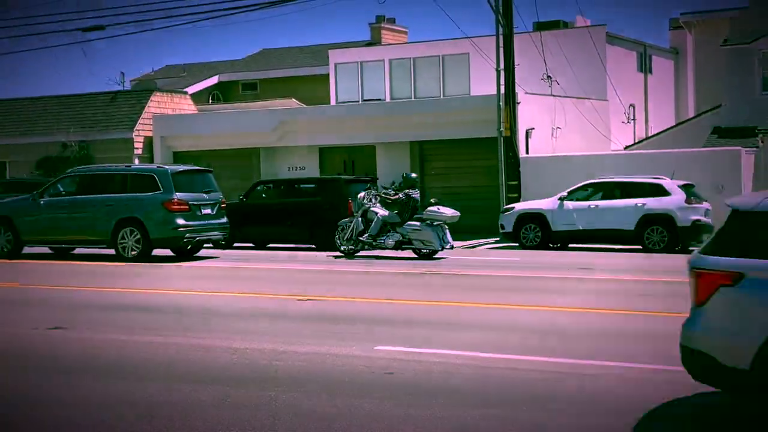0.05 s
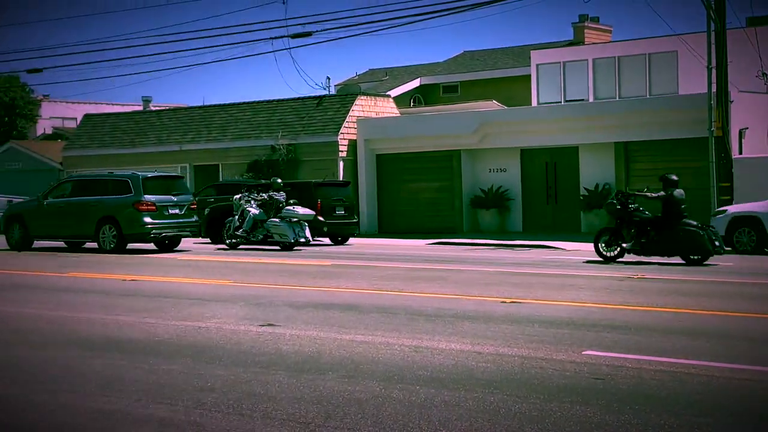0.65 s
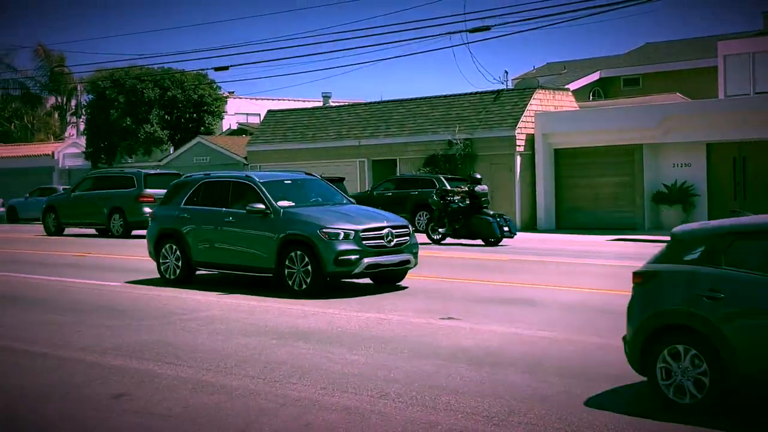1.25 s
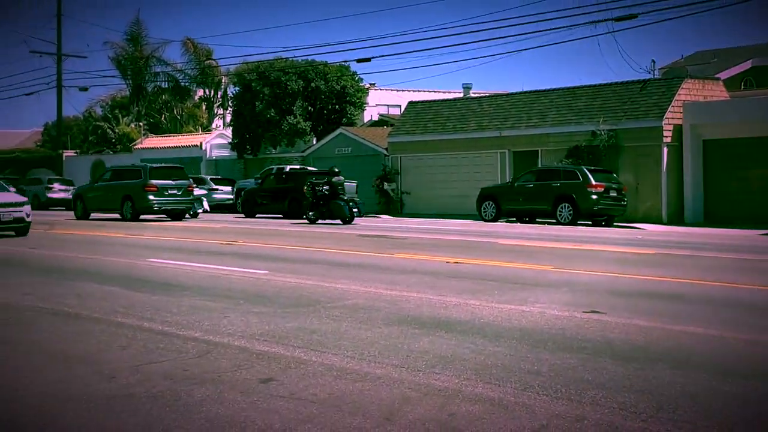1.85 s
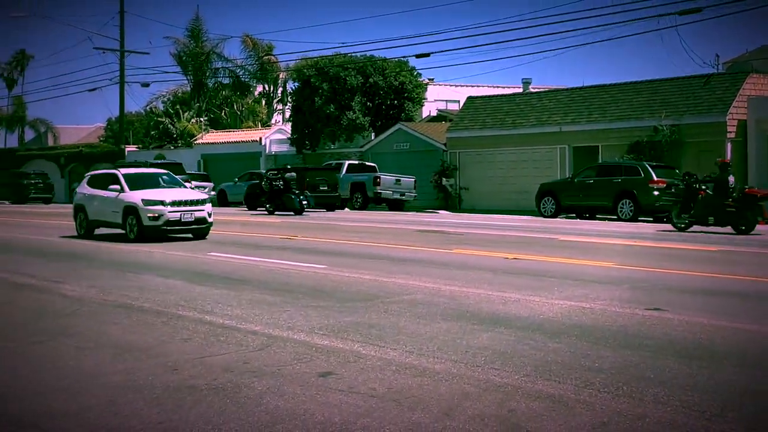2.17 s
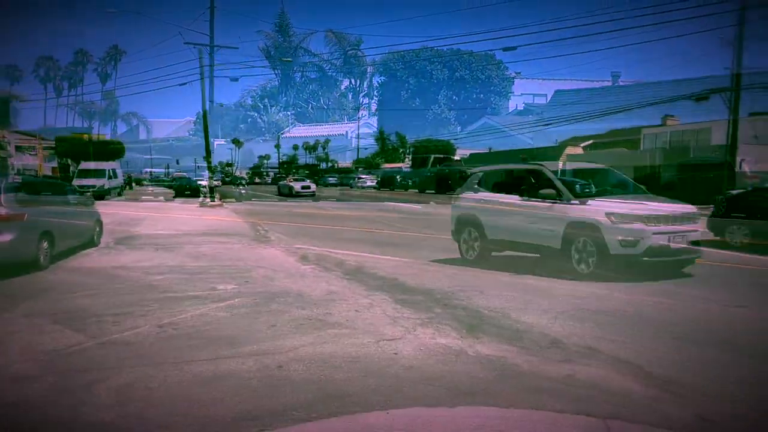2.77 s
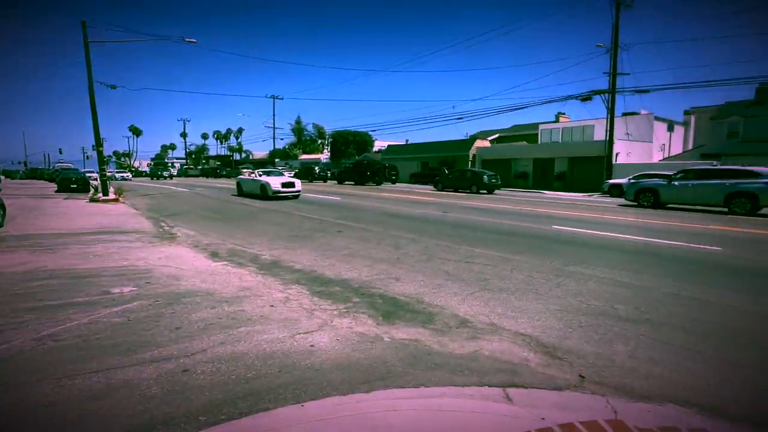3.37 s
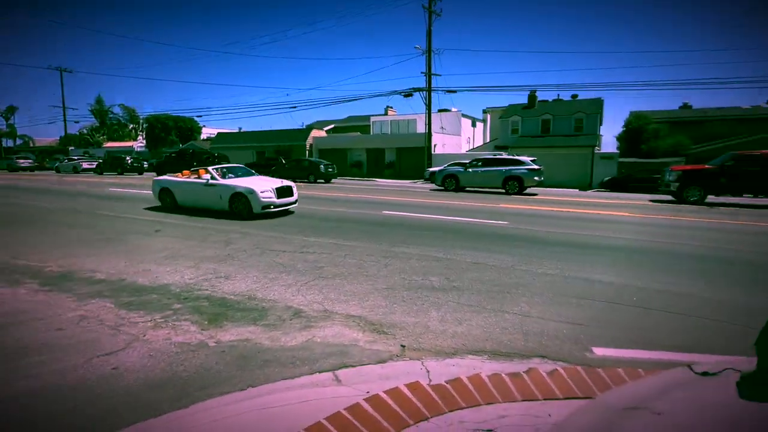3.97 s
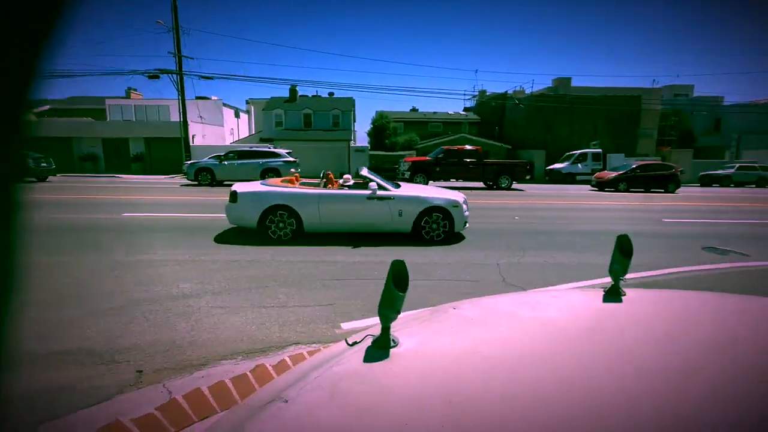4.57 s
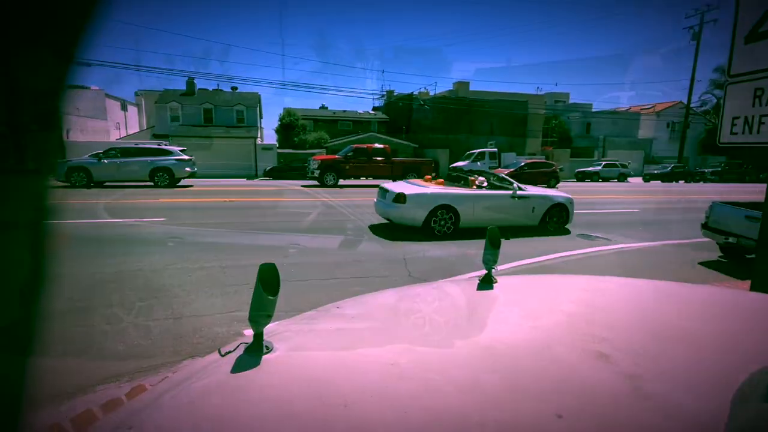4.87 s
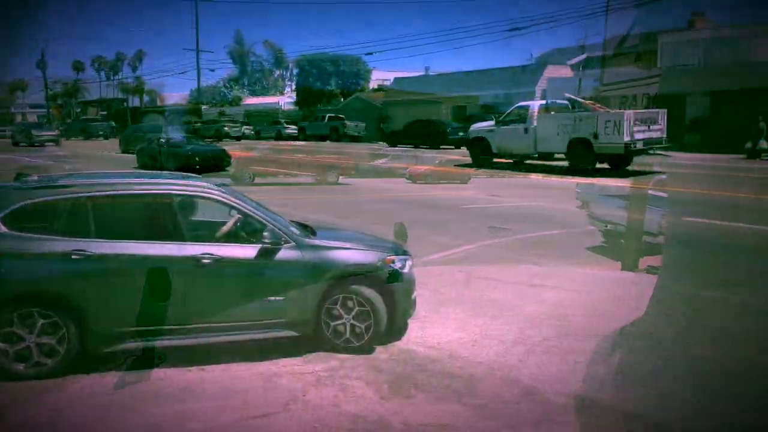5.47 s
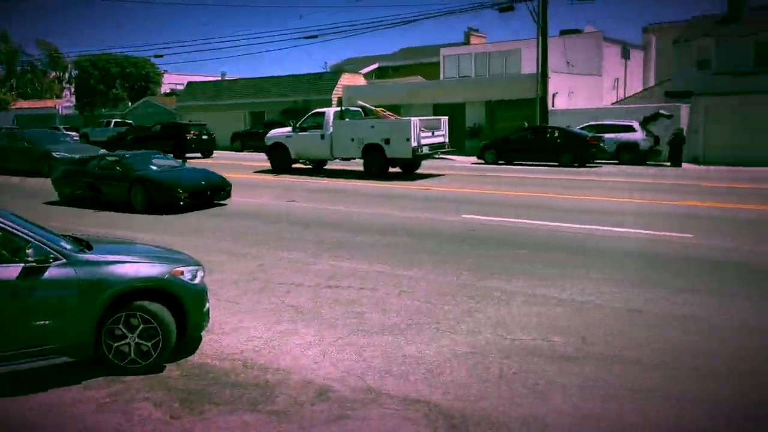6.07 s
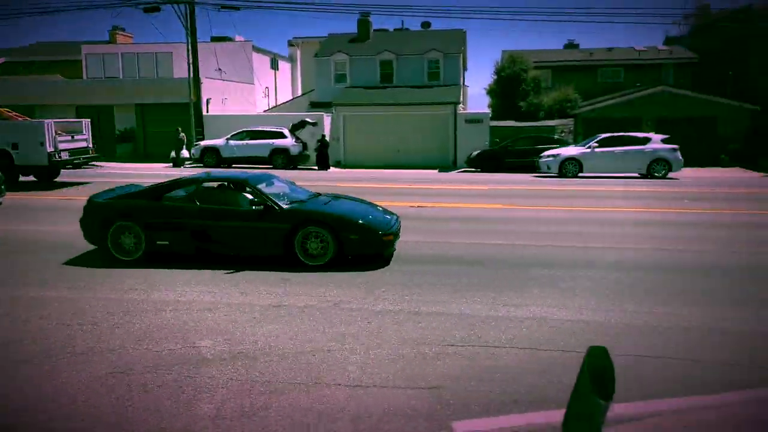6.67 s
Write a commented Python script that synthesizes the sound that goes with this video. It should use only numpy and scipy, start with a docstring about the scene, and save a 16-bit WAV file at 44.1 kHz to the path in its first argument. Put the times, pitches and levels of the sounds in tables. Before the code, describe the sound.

Two large motorcycles accelerate past at once, their exhausts booming and rasping with an uneven throb as each changes up a gear. As they fade, a quieter car drones by on roaring tyres. A pickup hums faintly, then a sports car approaches with a swelling growl. It is heard in stereo from the kerb of a road between houses, with a faint breeze.

```python
"""Coastal road between houses. Two V-twin motorcycles accelerate past, each changing up a gear:
uneven firings boom in the pipes, bark and rasp at the mouths and blow out gas; valves tick.
A car drones by on roaring tyres, a pickup hums, and a sports car draws near, its engine orders
growling and its intake rasping. Two small kerbside microphones in a light breeze hear it all;
the loudest peaks are rounded off."""
import sys
import numpy as np
from scipy import signal
from scipy.fft import rfft, irfft, next_fast_len
from scipy.io import wavfile
from scipy.ndimage import uniform_filter1d

SR = 44100
rng = np.random.default_rng(int(sys.argv[2]) if len(sys.argv) > 2 else 0)


def wrap_up_sound(samples):
    """Save the sound to the file named by the first command line argument, as 16-bit audio."""
    columns = np.atleast_2d(samples).T
    # keep every value between -1 and 1, then stretch to whole-number steps
    tamed = np.clip(columns, -1, 1)
    steps = np.round(tamed * 32767).astype(np.int16)
    wavfile.write(sys.argv[1], SR, steps)


N = 296660
TIME = np.arange(N) / SR

# Following motorcycle's engine speed. Each row: time in seconds, four-stroke cycles per second.
CHASE_SPEED = [(0, 17.3), (.3, 19.4), (.49, 20.7), (.6, 21.6), (.85, 23.3), (1.0, 24.3), (1.26, 25.3),
               (1.36, 21.3), (1.7, 22.4), (2.0, 23.4), (2.3, 24.3), (2.9, 26.1)]
# Tyre spectra. Each row: frequency in Hz, gain in dB.
TYRE_RUMBLE = [(20, -20.5), (35, -20), (52, 2), (80, 6.5), (130, 0.5), (200, 0.5), (280, -5.5), (400, -26),
               (800, -62.5)]
TYRE_HISS = [(1500, -18), (2500, 2), (3100, 2), (4500, -3.5), (6000, -8.5), (8500, -20), (10500, -15.5),
             (12500, -28), (14000, -51.5)]
# Stereo width, open road and between houses. Each row: frequency in Hz, side gain in dB.
ROAD_WIDTH = [(60, -14.5), (200, -5.5), (400, -2), (620, -4.5), (800, 4.5), (980, 1.5), (1230, 7.5),
              (1420, 5.5), (1620, 9), (1900, -1), (4000, -1), (13000, 3)]
STREET_WIDTH = [(60, -28.5), (120, -19.5), (200, -16), (360, -8), (660, -11), (1200, -4), (2200, -7.5),
                (4000, -109), (7000, 2.5), (13000, -4)]

STREET_T60_S, CHASE_START_TURNS = 0.888, 0.143
SPORTS_PASS_S = (6.898, 0.629)  # path for passing()
LATER_SPAN_S, CLOSE_SPAN_S = (4.57, 5.354, 7, 7.5), (5.843, 6.286, 7, 7.5)  # spans for envelope()


def motorcycles():
    """Two V-twins, one leading and one following, fire into their pipes; house fronts answer."""
    # Leader's engine speed. Each row: time in seconds, four-stroke cycles per second.
    lead_speed = [(0, 30.1), (.33, 32.1), (.55, 33), (.8, 34.1), (.97, 34.5), (1.1, 33.2), (1.22, 30),
                  (1.32, 26.5), (1.45, 26.8), (2.0, 27.5), (2.4, 28.7), (2.9, 32)]
    # Each row: time in seconds, leader minus follower in dB.
    balance = [(0, 11), (.6, -4), (1.3, -3.5), (2.25, -5), (2.9, 1)]
    lean = undb(curves(balance)[0] / 2)
    lead = v_twin(lead_speed, spread_db=2, jitter_s=0.00005, start_turns=0.15)
    chase = v_twin(CHASE_SPEED, spread_db=3, jitter_s=0.0001, start_turns=CHASE_START_TURNS)
    firings = undb(2) * lean * lead + chase / lean  # the leader has the more open pipes
    mid = pipe_boom(lead, chase, lean) + pipe_mouths(firings) + gas_hiss(firings) + valves() + clatters()
    walls = scatter(colour(mid, [(100, -8), (250, 2), (500, 0), (14000, 0)]), t60_s=0.3)
    side = np.sqrt(2 / 3) * quadrature(mid) + np.sqrt(1 / 3) * walls
    return stereo(mid, side, STREET_WIDTH)


def v_twin(speed, spread_db, jitter_s, start_turns):
    """Two uneven firings a cycle: the rear cylinder follows the front by 315 of 720 degrees."""
    turns = start_turns + np.cumsum(curves(speed)[0]) / SR
    due_turns = (np.arange(int(turns[-1]))[:, None] + [0, 315 / 720]).ravel()[1:]
    chance = rng.standard_normal((len(due_turns), 2))
    fire_s = np.interp(due_turns, turns, TIME) + jitter_s * chance[:, 0]
    pulses = np.zeros(N)
    pulses[np.clip(fire_s * SR, 0, N - 1).astype(int)] = undb(spread_db * chance[:, 1])
    return pulses


def pipe_boom(lead, chase, lean):
    """Firings ring the low modes of both exhausts; the deepest notes die away first."""
    # Exhaust modes. Each row: centre in Hz, width in Hz, gain in dB.
    lead_pipe = [(60.8, 30, -2), (102.6, 40.7, -0.5), (148, 40.1, -1), (195.8, 41.6, -8.5),
                 (240, 43.8, -8.5), (287.8, 35.6, -5)]
    chase_pipe = [(59.26, 16, 0.5), (147.6, 27.8, -5), (186.86, 44.8, -7), (243.8, 52, -6.5)]
    # Follower's strongest mode booms and ebbs. Each row: time in seconds, gain in dB.
    note_level = [(0, -3), (.6, -1.5), (.9, 1), (1.05, -0.5), (1.2, 3.5), (1.3, -3), (1.45, 3), (1.6, -2),
                  (1.72, 5), (1.85, 1.5), (2.0, 4), (2.3, 2.5), (2.42, -8.5), (2.9, -7)]
    note = undb(curves(note_level)[0]) * ring(chase, [(117.66, 20.34, 0)])
    boom = lean * steady(ring(lead, lead_pipe)) + steady(ring(chase, chase_pipe) + note) / lean
    boom = colour(boom, [(20, -3.5), (42, -16.5), (58, -0.5), (120, 1),
                         (200, 0.5), (400, -16.5), (1000, -45)])
    boom = steady(boom + undb(0.5) * scatter(boom, STREET_T60_S))
    boom *= undb(glide(-5.5, -9.5, middle_s=-1, scale_s=4.5))
    deep = filtered(boom, lambda hz: 1 / (1 + (hz / 80) ** 8))
    return (boom - deep * (1 - fade(1.9, 2.75))) * fade(2.42, 2.936)


def pipe_mouths(firings):
    """Blasts bark and rasp at the pipe mouths, changing voice as these turn towards the kerb."""
    # Spectra. Each row: frequency in Hz, gain in dB.
    bark_spectrum = [(150, -23.5), (225, 1), (280, 3), (350, 2), (420, -1), (490, -13), (620, -24.5),
                     (1200, -51)]
    rasp_spectrum = [(300, -31), (490, 13), (620, 7.5), (800, 0.5), (1000, 1), (1300, -15.5), (1700, -29.5),
                     (2300, -22), (4000, -48)]
    blast = steady(firings) + undb(-16) * steady(puffs(firings, decay_s=0.006))
    walls_db = -12 + 13 * np.clip(TIME / 1.4, 0, 1)  # more reflected sound with distance
    blast = mirrored(blast + undb(walls_db) * scatter(blast, STREET_T60_S))
    rasp_db = glide(-18.5, -31.5, middle_s=0.5341, scale_s=0.0044)
    rasp_db += 7.6 * bell(0.793, half_s=0.19)  # follower comes abreast
    bark_db = glide(-18.5, -17.5, middle_s=1.68, scale_s=1.22) + 1.1 * walk(16)
    bark_db += 2.4 * bell(2.41, half_s=0.057)  # follower pulls
    rasp = undb(rasp_db) * steady(colour(blast, rasp_spectrum))
    bark = undb(bark_db) * steady(colour(blast, bark_spectrum))
    return (bark + rasp + mouth_ring(blast)) * fade(2.5, 3.01)


def mirrored(x, echo_db=-8):
    """Reflection off parked cars; the changing detour sweeps a comb through the sound."""
    # Each row: time in seconds, delay in ms.
    detour = [(0, 4.02), (.5, 3.506), (.8, 3.75), (1.0, 3.76), (1.25, 3.18), (1.5, 3.06), (2.0, 2.893),
              (2.45, 2.79), (2.9, 3.03)]
    return x + undb(echo_db) * np.interp(TIME - curves(detour)[0] / 1000, TIME, x)


def mouth_ring(blast):
    """Throaty resonances of the pipe mouths sink in pitch as the riders pass."""
    # Each row: approaching centre in Hz, leaving centre in Hz, width in Hz, gain in dB.
    modes = [(213.3, 180.6, 54, 3), (455.2, 412.3, 63.3, 5.5), (646, 605, 93.3, -5)]
    # Each row: time in seconds, level in dB.
    level = [(0, -21.5), (.3, -19), (.52, -24.5), (.65, -16), (.85, -20.5), (1.15, -26.5), (1.4, -33),
             (1.7, -46), (2.2, -70)]
    voice = sum(undb(db) * sweep(blast, glide(high_hz, low_hz, middle_s=0.645, scale_s=0.664), width_hz)
                for high_hz, low_hz, width_hz, db in modes)
    return undb(curves(level)[0]) * steady(voice)


def gas_hiss(firings):
    """Exhaust gas hisses in puffs over an even flow and fades; swells of traffic hiss rise over it."""
    # Each row: frequency in Hz, gain in dB.
    spectrum = [(700, 9), (1400, 7.5), (2100, 6), (2700, 4.5), (4000, 1.5), (5500, -0.5), (6800, -5),
                (8200, -26), (10000, -13), (12000, -21), (14000, -27.5)]
    # Each row: centre in seconds, level in dB, half length in seconds.
    traffic_swells = [(1.52, -43, 0.16), (2.04, -43, 0.095), (2.33, -37.5, 0.126)]
    gas = steady(puffs(firings, decay_s=0.015)) * undb(1.8 * walk(40)) + undb(3) * noise()
    gain = undb(glide(-26.5, -34, middle_s=1.2449, scale_s=0.96)) + swells(traffic_swells)
    return gain * undb(0.7 * walk(18)) * steady(colour(gas, spectrum)) * fade(2.58, 2.92)


def valves(ring_hz=5400, ring_s=0.003):
    """The follower's valves tap; each tap rings the cylinder head at its own pitch."""
    # Each row: frequency in Hz, gain in dB.
    tap_spectrum = [(1500, -11.5), (3000, 4), (4500, 2), (5800, -2.5), (7000, -8), (8500, -33.5),
                    (13000, -23)]
    # Audible spells. Each row: centre in seconds, level in dB, half length in seconds.
    spells = [(.335, -38.5, 0.035), (.49, -37, 0.066), (0.575, -35.5, 0.035), (0.68, -35.5, 0.143),
              (.92, -34, 0.127), (1.255, -34, 0.0325), (1.318, -36, 0.0144)]
    taps = v_twin(CHASE_SPEED, spread_db=1, jitter_s=0.0003, start_turns=CHASE_START_TURNS)
    hz = ring_hz * (1 + 0.092 * rng.standard_normal(512))[np.cumsum(taps > 0)]
    clink = decays(taps, ring_s) * np.sin(2 * np.pi * np.cumsum(hz) / SR)
    tap = steady(colour(puffs(taps, decay_s=0.002), tap_spectrum))
    return swells(spells) * (tap + undb(-4) * steady(clink))


def clatters():
    """Motorcycle clatters and clinks: short swells of noise, each in one resonance."""
    # Each row: centre in seconds, level in dB, centre in Hz, width in Hz, half length in seconds.
    events = [(0.414, -22, 928, 420, .05), (0.426, -41.5, 10370, 3000, 0.044),
              (0.586, -19.5, 5800, 900, 0.004), (2.165, -25, 1500, 350, 0.0087),
              (2.658, -41, 5470, 1499, 0.098)]
    out = np.zeros(N)
    for s, db, hz, width_hz, half_s in events:
        start, count = int((s - half_s) * SR), int(2 * half_s * SR)
        mode = [(hz, width_hz, 0)]
        burst = ring(ring(rng.standard_normal(SR // 2), mode), mode)[-count:]
        out[start:start + count] += undb(db) * burst / burst.std() * np.hanning(count)
    return out


def exhaust_cracks(decay_s=0.00237):
    """A hard firing kicks a pipe, which rings for a cycle or two."""
    # Each row: start in seconds, gain in dB, ring in Hz.
    hard_firings = [(.042, -1.5, 600), (.075, -7.5, 620), (.316, -6, 640), (.562, -17.5, 620),
                    (2.509, -13, 600), (6.17, -12, 730), (6.538, -11.5, 790)]
    out = np.zeros(N)
    age_s = TIME[:2048]
    for s, db, hz in hard_firings:
        start = int(s * SR)
        crack = np.sin(2 * np.pi * hz * age_s) * np.exp(-age_s / decay_s)
        out[start:start + len(age_s)] += undb(db) * crack
    return direct(out, STREET_WIDTH)


def car_engines():
    """The first car's drone, a deeper engine beyond it and the pickup's falling hum."""
    # First car's engine speed. Each row: time in seconds, firing rate in Hz.
    drone_speed = [(2.85, 176.8), (3.5, 183.9), (4, 186.9), (4.6, 188.9), (5.2, 194.1)]
    # Each row: multiple of the firing rate, gain in dB.
    drone_orders = [(.5, -20), (.75, -12.5), (1, -1), (1.25, -32.5), (2, -27.5)]
    # One swell, then brief dips. Each row: centre in seconds, change in dB, half length in seconds.
    drone_changes = [(3.3, 1.5, 0.257), (3.711, -4.5, 0.176), (4.138, -10.5, 0.087), (4.443, -5, 0.055)]
    # Each row: time in seconds, pitch in Hz, level in dB.
    far_track = [(2.95, 73.43, -27.5), (3.2, 76.66, -30.5), (3.35, 85.66, -22), (3.55, 86.02, -29.5),
                 (3.85, 85.62, -24), (3.97, 83.23, -28)]
    pickup_track = [(5.2, 333.1, -31.5), (5.4, 329.5, -30.5), (5.8, 324.9, -37.5), (5.95, 325.2, -42.5)]
    drone = engine(curves(drone_speed)[0], drone_orders, waver=0.00724, flutter_db=0.11)
    changes_db = sum(db * bell(s, half_s) for s, db, half_s in drone_changes)
    drone *= undb(-17.5 - 2.5 * (TIME - 3.08) + changes_db) * envelope((2.9, 3.08, 4.7, 5.25))
    hz, db = curves(far_track)
    far = undb(db) * engine(hz, [(1, 0), (3, -10.5)], waver=0.015, flutter_db=1.2)
    hz, db = curves(pickup_track)
    pickup = undb(db) * engine(hz, [(1 / 3, -3), (1 / 2, -2), (1, 0)], waver=0.0053, flutter_db=0)
    engines = drone + far * during(far_track, fade_s=0.11) + pickup * during(pickup_track, fade_s=0.288)
    return direct(engines, [(60, -23.5), (180, -11.5), (400, -8)])[::-1]  # right microphone first


def sports_car():
    """An eight-cylinder engine nears; unequal pipes add quarter orders, the intake gulps air."""
    # Each row: time in seconds, firing rate of one bank in Hz.
    speed = [(5.15, 106.6), (5.5, 107.5), (5.9, 110.1), (6.25, 113.7), (6.73, 115.6)]
    # Each row: multiple of that rate, gain in dB.
    growl_orders = [(1, 1), (1.25, -4), (2.25, -18), (2.5, -8), (2.75, -5), (3, -9), (3.25, -12.5),
                    (3.5, -18), (3.75, -11.5)]
    snarl_orders = [(5, -8), (6, -4.5), (6.25, -8), (6.5, -14), (6.75, -7), (7, -8.5), (7.25, -9.5),
                    (7.5, -16.5), (8, -5.5), (9, -15.5), (10, -14), (10.25, -18.5)]
    # Each row: time in seconds, level in dB.
    snarl_level = [(5.4, -42.5), (5.85, -35.5), (6.08, -30.5), (6.17, -32.5), (6.26, -28), (6.4, -28),
                   (6.5, -25.5), (6.6, -23.5), (6.73, -25)]
    howl_level = [(5.15, -43.5), (5.45, -31.5), (5.67, -33.5), (5.74, -27), (5.98, -34.5), (6.07, -25.5),
                  (6.13, -35.5), (6.21, -21.5), (6.42, -19), (6.48, -26.5), (6.52, -19.5), (6.6, -16.5),
                  (6.72, -13.5)]
    # Each row: centre in Hz, width in Hz, gain per pass in dB.
    intake_modes = [(1667, 120, 1.5), (2181, 106, 3), (2661, 120, -1), (2923, 170, -0.5), (3406, 300, -4.5),
                    (4404, 210, -2.5), (4873, 180, -2.5), (6000, 790, -15.5), (10960, 2400, -12.5)]
    # Noise blown out by the firings. Each row: frequency in Hz, gain in dB.
    throat_spectrum = [(60, -22.5), (100, 6), (145, 5.5), (185, 4.5), (230, 0.5), (320, -13.5),
                       (520, -11.5), (760, -3.5), (930, -13.5), (1300, -40.5)]
    # Each row: time in seconds, left minus right in dB.
    pan = [(5.2, -2.5), (6.25, 2.5), (6.73, 0.5)]
    hz = curves(speed)[0]
    growl = engine(hz, growl_orders, waver=0.0035, flutter_db=1.4)
    growl *= passing(SPORTS_PASS_S, -18.5, steepness=1.91) * (1 + 0.308 * walk(110))  # uneven firings
    snarl = engine(hz, snarl_orders, waver=0.008, flutter_db=3)
    snarl *= undb(curves(snarl_level)[0]) * (1 + 0.45 * walk(170))
    firing = engine(hz, [(2, 0)], waver=0.004, flutter_db=1.2)
    firing *= passing(SPORTS_PASS_S, -16.5, steepness=2.28) * (1 + 0.25 * walk(110))
    howl = engine(hz, [(4, 0)], waver=0.0025, flutter_db=0.7)
    howl *= undb(curves(howl_level)[0]) * (1 + 0.18 * walk(110))
    gulps = 1 + 0.43 * np.sin(2 * np.pi * np.cumsum(hz) / SR)
    intake = undb(-36.5) * steady(ring(ring(gulps * noise(), intake_modes), intake_modes))
    throat = steady(colour(gulps * noise(), throat_spectrum))
    throat *= passing(SPORTS_PASS_S, -19.5, steepness=2.15)
    exhaust = growl + snarl + firing + howl + throat
    car = exhaust * envelope(LATER_SPAN_S) + intake * envelope(CLOSE_SPAN_S)
    pair = direct(car, [(110, -30.5), (230, -14.5), (460, -6), (900, -6.5), (2200, -24), (11000, -25.5)])
    return panned(pair, curves(pan)[0])


def engine(hz, orders, waver, flutter_db):
    """Engine orders: the speed wavers, and each flutters as the paths over the road change."""
    phase = 2 * np.pi * np.cumsum(hz * (1 + waver * walk(25))) / SR
    return np.sqrt(2) * sum(undb(db + flutter_db * walk(14)) * np.sin(k * phase + 2 * np.pi * rng.random())
                            for k, db in orders)


def near_lane_tyres():
    """Tyres of cars slipping by in the near lane while the motorcycles pass."""
    # Each row: centre in seconds, level in dB, half length in seconds.
    passes = [(1.25, -26, 0.722), (2.35, -30.5, 0.413)]
    # Each row: frequency in Hz, gain in dB.
    spectrum = [(200, -12), (550, 4.5), (800, 3), (1100, -1), (1500, -10), (2200, -15.5), (4000, -39)]
    return swells(passes) * direct(tyre_noise(spectrum, patchy_db=0.5), STREET_WIDTH)


def tyre_band_swells():
    """Tyre noise swells briefly in narrow bands as cars pass."""
    # Each row: centre in seconds, level in dB, half length in seconds, centre in Hz, width in Hz.
    bands = [(1.254, -27.5, 0.048, 1056, 120), (1.383, -38.5, 0.087, 820, 150),
             (1.995, -40, 0.22, 1567, 240), (2.464, -39.5, 0.3, 1372, 190), (3.423, -29, 0.06, 567, 120),
             (3.678, -41, 0.136, 2214, 260), (3.713, -31.5, 0.177, 639, 220.6),
             (4.298, -30, 0.14, 614, 219.3), (4.27, -40, 0.274, 1889, 169.8),
             (4.752, -39.5, 0.234, 1882, 189.5), (4.89, -38, 0.327, 1423, 189),
             (4.9, -36.5, 0.345, 1013, 140)]
    out = np.zeros(N)
    for s, db, half_s, hz, width_hz in bands:
        mode = [(hz, width_hz, 0)]
        band = ring(ring(noise(), mode), mode)
        out += undb(db) * bell(s, half_s) * band / band.std()
    return direct(out, [(500, -5), (1000, -6.5), (2000, -4.5)])


def first_car_tyres(direct_share=0.216, hiss_direct_share=0.076, right_lag_s=0.00046):
    """The first car's tyres rumble, roar and hiss past, partly direct and partly scattered."""
    # Each row: frequency in Hz, gain in dB.
    roar_spectrum = [(200, -14.5), (300, -6), (420, -7.5), (520, 0), (690, 0.5), (790, -8.5), (960, -1),
                     (1150, -13), (1280, -13.5), (1420, -9), (1620, -17), (1850, -11), (2500, -21),
                     (4000, -38)]
    pass_s, hiss_pass_s = (4.09, 1.266), (4.53, 1.764)  # hiss is thrown backwards, so peaks later

    def wide(spectrum, pan_db, patchy_db):
        mid, scattered = (tyre_noise(spectrum, patchy_db) for _ in range(2))
        side = np.sqrt(direct_share) * quadrature(mid) + np.sqrt(1 - direct_share) * scattered
        return stereo(mid, undb(-0.53) * side, ROAD_WIDTH, pan_db)

    rumble = passing(pass_s, -22, steepness=0.74) * wide(TYRE_RUMBLE, pan_db=-0.97, patchy_db=0.5)
    roar = passing(pass_s, -27.5, steepness=1) * wide(roar_spectrum, pan_db=1.5, patchy_db=1.06)
    straight, left, right = (tyre_noise(TYRE_HISS, patchy_db=1.45) for _ in range(3))
    straight = np.array([straight, np.roll(straight, int(right_lag_s * SR))])
    hiss = np.sqrt(hiss_direct_share) * straight + np.sqrt(1 - hiss_direct_share) * np.array([left, right])
    hiss = passing(hiss_pass_s, -37.5, steepness=2) * panned(hiss, pan_db=4)
    return (rumble + roar + hiss) * envelope((2.58, 2.85, 4.9, 5.3))


def later_tyres():
    """The later cars' tyres draw near, dulled by distance, then bright once the sports car is close."""
    # Each row: frequency in Hz, gain in dB.
    roar_spectrum = [(150, 0), (260, -5.5), (380, 8.5), (520, 0.5), (780, 0), (1000, 1), (1150, -3.5),
                     (1450, -8), (1700, -9), (1900, -11), (2180, -5), (2500, -16), (4000, -64.5)]
    dulling = [(3000, -1), (6000, 0.5), (10000, -7), (14000, 0)]
    rumble = passing(SPORTS_PASS_S, -27.5, steepness=0.077) * tyre_noise(TYRE_RUMBLE, patchy_db=3)
    roar = passing(SPORTS_PASS_S, -25, steepness=0.37) * tyre_noise(roar_spectrum, patchy_db=1.14)
    far_hiss = colour(tyre_noise(TYRE_HISS, patchy_db=0.5), dulling)
    far_hiss *= passing(SPORTS_PASS_S, -38.5, steepness=0.373)
    close_hiss = undb(-41) * tyre_noise(TYRE_HISS, patchy_db=1) * envelope(CLOSE_SPAN_S)
    return (rumble + roar + far_hiss) * envelope(LATER_SPAN_S) + close_hiss


def tyre_noise(spectrum, patchy_db):
    """Rolling noise; its level flickers with the patches of the road."""
    return steady(colour(noise(), spectrum)) * undb(patchy_db * walk(25))


def breeze():
    """Light air rumbles on each microphone separately."""
    spectrum = [(20, -3), (50, 3.5), (100, -2.5), (250, -28)]
    return undb(-42) * np.array([steady(colour(noise(), spectrum)) * undb(2 * walk(5)) for _ in range(2)])


def undb(db):
    """Decibels to gain."""
    return 10 ** (np.asarray(db) / 20)


def curves(table):
    """Each column after the first, interpolated over time."""
    s, *columns = np.transpose(table)
    return [np.interp(TIME, s, column) for column in columns]


def envelope(span_s):
    """Gain over a span: start, full, fade start, silent."""
    return np.interp(TIME, span_s, [0, 1, 1, 0])


def during(table, fade_s):
    """One while a table lasts, fading in before and out after."""
    start_s, end_s = table[0][0], table[-1][0]
    return envelope((start_s - fade_s, start_s, end_s, end_s + fade_s))


def fade(start_s, silent_s):
    """Hold, then release."""
    return np.interp(TIME, [start_s, silent_s], [1, 0])


def bell(s, half_s):
    """Smooth hump of height 1."""
    return np.exp(-((TIME - s) / half_s) ** 2)


def swells(rows):
    """Summed gain of several humps."""
    return sum(undb(db) * bell(s, half_s) for s, db, half_s in rows)


def glide(before, after, middle_s, scale_s):
    """Smooth step between two values."""
    return before + (after - before) * (1 + np.tanh((TIME - middle_s) / scale_s)) / 2


def passing(path_s, abreast_db, steepness):
    """Gain of a source on a straight road; steepness 1 falls as 1 / distance."""
    abreast_s, cover_s = path_s  # cover_s: distance from the kerb over speed
    return undb(abreast_db) / np.hypot(1, (TIME - abreast_s) / cover_s) ** steepness


def noise():
    """White noise."""
    return rng.standard_normal(N)


def walk(rate_hz):
    """Random levels joined by straight lines; spread near 1."""
    count = int(rate_hz * N / SR) + 2
    return 1.2545 * np.interp(TIME * rate_hz, np.arange(count), rng.standard_normal(4096)[:count])


def decays(pulses, decay_s):
    """An exponential tail after each pulse."""
    return signal.lfilter([1], [1, -np.exp(-1 / (decay_s * SR))], pulses)


def puffs(pulses, decay_s):
    """A burst of noise after each pulse."""
    return noise() * decays(pulses, decay_s)


def steady(x, size=8000):
    """Scale to a running rms of 1, keeping the quick throb."""
    return x / np.sqrt(uniform_filter1d(uniform_filter1d(x ** 2, size), size) + 1e-14)


def log_gain(bins_hz, hz, db):
    """Gain at the bins, interpolated in dB over log frequency."""
    return undb(np.interp(np.log(bins_hz + 1), np.log(hz), db))


def colour(x, points, size=8192):
    """Causal filter with a (Hz, dB) response, built from its cepstrum."""
    hz, db = np.transpose(points)
    hz, db = np.append(hz, 2 * hz[-1]), np.append(db, db[-1] - 23.5)  # falls for one more octave
    cepstrum = irfft(np.log(log_gain(np.arange(size // 2 + 1) * SR / size, hz, db)))
    cepstrum[1:size // 2] *= 2
    cepstrum[size // 2 + 1:] = 0
    return signal.oaconvolve(x, irfft(np.exp(rfft(cepstrum))))[:N]


def filtered(x, response, pad=4096):
    """Apply a response, a function of Hz, with the ends softly extended."""
    padded = np.pad(x, pad, mode="reflect", reflect_type="odd")
    padded *= signal.windows.tukey(len(padded), 2 * pad / len(padded))
    count = next_fast_len(len(padded), True)
    bins_hz = np.arange(count // 2 + 1) * SR / count
    return irfft(rfft(padded, count) * response(bins_hz), count)[pad:pad + N]


def ring(x, modes):
    """Parallel resonances of alternating sign."""
    return sum((-1) ** k * undb(db) * signal.lfilter(*signal.iirpeak(hz, hz / width_hz, fs=SR), x)
               for k, (hz, width_hz, db) in enumerate(modes))


def sweep(x, hz, width_hz):
    """A resonance whose centre moves."""
    carrier = np.exp(2j * np.pi * np.cumsum(hz) / SR)
    lowpass = signal.butter(2, width_hz / 2, fs=SR, output="sos")
    return 2 * np.real(carrier * signal.sosfilt(lowpass, x / carrier))


def scatter(x, t60_s):
    """Dense decaying reflections with the power and colour of the direct sound."""
    tail = rfft(rng.standard_normal(SR) * undb(-60 * TIME[:SR] / t60_s))
    return signal.oaconvolve(x, irfft(tail / np.abs(tail))[:SR // 2])[:N]


def quadrature(x):
    """A quarter cycle ahead, like the difference between two close microphones."""
    return filtered(x, lambda hz: 1j)


def panned(pair, pan_db):
    """Raise left over right by pan_db."""
    return pair * undb(np.outer([1, -1], pan_db) / 2)


def stereo(mid, side, width, pan_db=0):
    """Left and right from mid and side; width shapes the side in (Hz, dB)."""
    side = filtered(side, lambda hz: log_gain(hz, *np.transpose(width)))
    return panned(np.array([mid + side, mid - side]), pan_db)


def direct(x, width):
    """A direct sound that reaches the left microphone first."""
    return stereo(x, quadrature(x), width)


def scene():
    """Engines and tyres in a light breeze."""
    engines = motorcycles() + exhaust_cracks() + car_engines() + sports_car()
    tyres = near_lane_tyres() + tyre_band_swells() + first_car_tyres()
    tyres += stereo(later_tyres(), undb(-2.5) * later_tyres(), ROAD_WIDTH, pan_db=1.5)
    return engines + tyres + breeze()


def record(dry, ceiling=0.95, top_hz=13700):
    """The recorder rounds the loudest peaks and cuts the top."""
    rounded = dry / (1 + (dry / ceiling) ** 4) ** (1 / 4)
    return signal.sosfilt(signal.ellip(8, 0.2, 70, top_hz, fs=SR, output="sos"), rounded)


dry = scene()
out = record(dry)
wrap_up_sound(out)
```